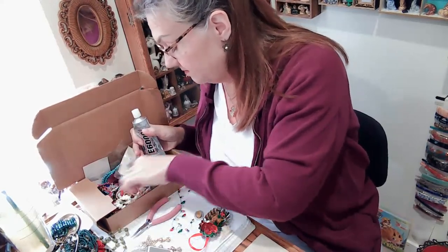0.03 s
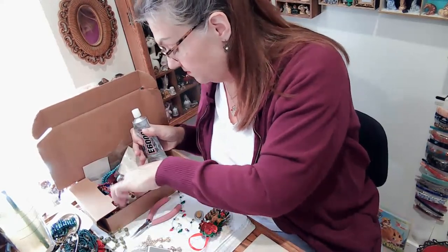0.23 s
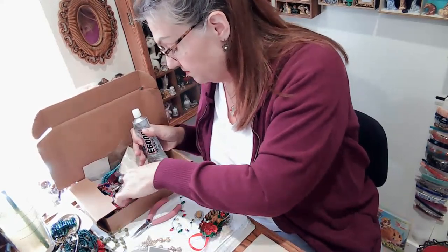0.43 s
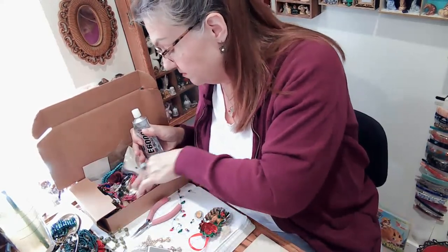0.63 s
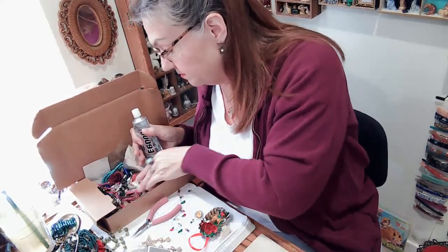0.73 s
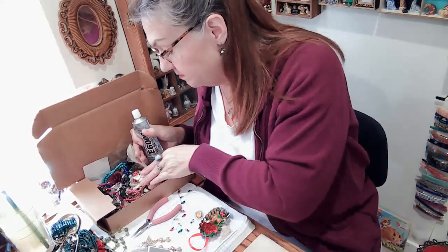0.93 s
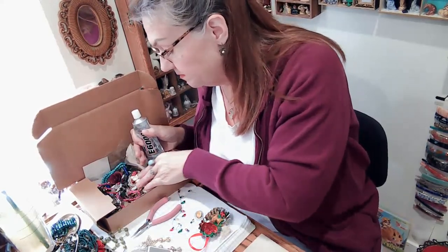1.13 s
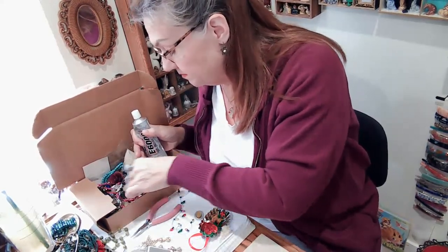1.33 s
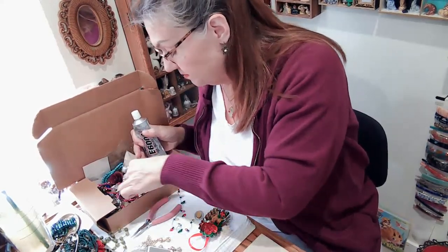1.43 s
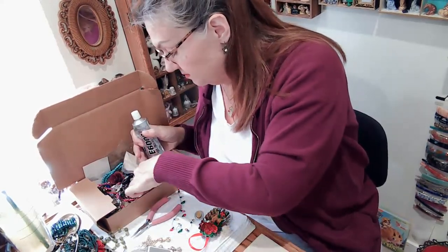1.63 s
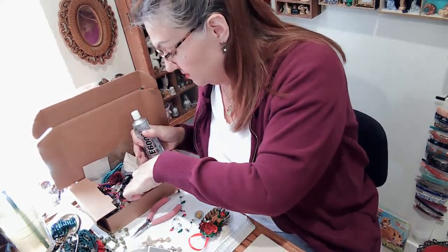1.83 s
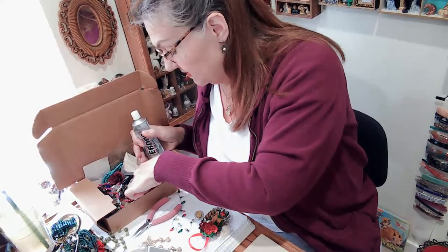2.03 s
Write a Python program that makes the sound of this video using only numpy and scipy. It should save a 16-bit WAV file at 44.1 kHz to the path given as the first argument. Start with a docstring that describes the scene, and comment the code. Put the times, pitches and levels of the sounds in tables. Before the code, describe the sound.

Beads and small jewelry rattle in a cardboard box as a hand stirs them, starting with a bright jingle, then knocks and clinks, one hard knock, then softer clicks; close microphone, small quiet room.

```python
"""A small room, a cardboard box of beads and loose jewelry close to one microphone, a hand rummaging in it.
Each stroke sets random bead contacts rattling and ringing, and scrapes them over the cardboard.
Heavy pieces knock on damped panel modes; beads click as short coloured bursts; small pieces clink or slide.
Metal modes jingle at the start, fine parts fizz in the top treble, and the hand bumps the hollow box.
Behind it lies a quiet room tone of coloured noise."""
import sys
import numpy as np
from scipy import signal
from scipy.fft import rfft, irfft, next_fast_len
from scipy.io import wavfile
from scipy.ndimage import map_coordinates

SR = 44100
rng = np.random.default_rng(int(sys.argv[2]) if len(sys.argv) > 2 else 0)


def pcm_store(signal):
    """Save signal as 16-bit PCM."""
    levels = np.round(np.clip(np.atleast_2d(signal), -1, 1) * 32767)
    wavfile.write(sys.argv[1], SR, levels.astype(np.int16).T)


N = 91595

BEAD_RATE, SCRAPE_RATE = 800, 900  # contacts per s
SCATTER_DB = 2.6  # spread of contact sizes


def amp(db):
    """Decibels to gain."""
    return 10 ** (np.asarray(db) / 20)


def unit(x):
    """Scale to rms 1."""
    return x / np.sqrt(np.mean(x ** 2) + 1e-20)


def along(points, hz):
    """Interpolate (Hz, value) points on a log frequency axis."""
    f, v = np.transpose(points)
    return np.interp(np.log(hz + 1), np.log(f + 1), v)


def filtered(x, response):
    """Weight the spectrum of x by a response of frequency."""
    m = next_fast_len(len(x) + 4096)
    spectrum = rfft(x, m) * response(np.fft.rfftfreq(m, 1 / SR))
    return irfft(spectrum, m)[:len(x)]


def highpass(x, hz):
    """Remove what lies below hz."""
    return signal.sosfilt(signal.butter(4, hz, 'high', fs=SR, output='sos'), x)


def resonance(f, hz, width):
    """Response of one damped resonance, peaking at 1."""
    return 1j * f * width / (hz * hz - f * f + 1j * f * width)


def add(out, s, x):
    """Mix x into out at time s."""
    i = max(0, round(s * SR))
    out[i:i + len(x)] += x[:max(0, N - i)]


def decay(t, t60):
    """Exponential fade, 60 dB down after t60 seconds."""
    return np.exp(-np.log(1000) * t / t60)


def swell(s, rise, hold, fall):
    """Linear rise, hold, then a fall in dB per second."""
    t = np.arange(N) / SR - s
    return np.clip(t / rise, 0, 1) * amp(-fall * np.maximum(t - rise - hold, 0))


def ring(modes, attack_s):
    """Damped modes struck once, their levels a little different at each strike."""
    t = np.arange(SR // 2) / SR
    tones = np.zeros(len(t))
    for hz, db, t60 in modes:
        tones += amp(db + rng.normal()) * decay(t, t60) * np.sin(2 * np.pi * hz * t)
    return tones * (1 - np.exp(-t / attack_s)) ** 2


def contacts(rate):
    """Tiny impacts of random size and sign at random moments."""
    chance, size, sign = rng.random(N), rng.standard_normal(N), rng.choice([-1, 1], N)
    return (chance < rate / SR) * sign * amp(SCATTER_DB * np.clip(size, -2, 2))


# Colour of the quiet room: f/Hz, level/dB
ROOM_TONE_COLOUR = [(25, -35), (50, -8), (85, 1.5), (300, -1), (500, -9), (3000, -25.5), (15500, -22.5)]
ROOM_TONE_DB = -59.5


def room_tone():
    """Steady noise with the colour of the quiet room."""
    noise = rng.standard_normal(N)
    return amp(ROOM_TONE_DB) * unit(filtered(noise, lambda f: amp(along(ROOM_TONE_COLOUR, f))))


# Reverberation of the small room: f/Hz, t60/s
ROOM_T60 = [(200, 0.2), (1600, 0.31), (6000, 0.26)]
ROOM_DB, EARLY_DB = -8.5, -8.5  # energy against the direct sound
EARLY_T60_S = 0.028


def room(x):
    """Direct sound, quick echoes off lid and table, and the short tail of the room."""
    hz, t, bands = signal.stft(rng.standard_normal(SR // 2), SR, nperseg=256)
    fading = bands * decay(t, along(ROOM_T60, hz)[:, None])  # each band fades at its own pace
    tail = signal.istft(fading, SR, nperseg=256)[1]
    t = np.arange(len(tail)) / SR
    early = rng.standard_normal(len(t)) * decay(t, EARLY_T60_S) * (t > .003)
    tail = tail * (t > .006)
    echo = amp(EARLY_DB) * early / np.linalg.norm(early) + amp(ROOM_DB) * tail / np.linalg.norm(tail)
    return x + signal.fftconvolve(x, echo)[:N]


# Resonances inside the box: f/Hz, width/Hz, level/dB against the direct sound
BOX_AIR = [(1280, 19, -20.5), (1600, 11, -16), (1640, 18, -10.5)]


def box_air(x):
    """The open box adds narrow resonances."""
    return filtered(x, lambda f: 1 + sum(amp(db) * resonance(f, hz, width) for hz, width, db in BOX_AIR))


# The hand bumps the box: t/s, hollow boom level/dB, wall level/dB
BUMPS = [(0.026, -39, -39), (.185, -37.5, -27), (0.217, -41.5, -25), (.302, -45, -19), (.315, -27, -15.5),
         (0.461, -45.5, -30), (0.713, -36, -44.5), (0.806, -41.5, -58.5), (1.772, -68, -33.5)]
# Hollow modes of the box: f/Hz, level/dB, t60/s
BOOM_MODES = [(142.2, -7.5, 0.11), (200, 3.5, 0.095)]
# Modes of the box walls: f/Hz, level/dB, t60/s
WALL_MODES = [(476, -3, 0.063), (583.6, 9, 0.035), (739, -4.5, 0.064)]
BUMP_ATTACK_S = 0.0029
BUMP_DETUNE = .025  # relative spread: the pressing hand shifts the modes from bump to bump


def bumps():
    """Soft blows sound the low modes of the box."""
    out = np.zeros(N)
    for s, boom_db, wall_db in BUMPS:
        for modes, db in (BOOM_MODES, boom_db), (WALL_MODES, wall_db):
            pressed = [(hz * np.exp(BUMP_DETUNE * rng.normal()), level, t60) for hz, level, t60 in modes]
            add(out, s, amp(db) * ring(pressed, BUMP_ATTACK_S))
    return out


FINE_RISE_S, FINE_FALL_DB_PER_S = .01, 410  # shared by slithers and slides

# The finest parts slither: start t/s, hold/s, level/dB
SLITHERS = [(0, 0.051, -36.5), (1.325, .045, -45.5)]
SLITHER_LOW_HZ = 11800


def slither():
    """Fine chain slides: tiny contacts, heard only in the top treble as a thin fizz."""
    fizz = unit(highpass(contacts(BEAD_RATE), SLITHER_LOW_HZ))
    return fizz * sum(amp(db) * swell(s, FINE_RISE_S, hold, FINE_FALL_DB_PER_S) for s, hold, db in SLITHERS)


# A piece slides and sings at its own resonance: start t/s, hold/s, level/dB, f/Hz
SLIDES = [(.34, 0.073, -41, 1620), (1.661, 0.054, -48.5, 1760)]
SLIDE_WIDTH_HZ = 150


def slides():
    """Tiny slips keep one narrow resonance of a sliding piece ringing."""
    out = np.zeros(N)
    for s, hold, db, hz in SLIDES:
        tone = unit(filtered(contacts(SCRAPE_RATE), lambda f: resonance(f, hz, SLIDE_WIDTH_HZ)))
        out += amp(db) * tone * swell(s, FINE_RISE_S, hold, FINE_FALL_DB_PER_S)
    return out


# Modes of the small metal parts: f/Hz, level/dB, t60/s
METAL_MODES = [(4394, -17, 0.38), (5700, -2, .04), (7910, -4, 0.076), (8090, -4, 0.075), (9190, -3, 0.37),
               (9383, -7.5, 0.059), (9680, 0.5, 0.029)]
JINGLE_DB, JINGLE_RATE = -15.5, 1300  # level; contacts per s
JINGLE_HOLD_S, JINGLE_FALL_DB_PER_S = 0.022, 247


def jingle():
    """Small metal parts strike each other many times at the start and settle."""
    strikes = contacts(JINGLE_RATE)
    glints = unit(signal.fftconvolve(strikes, ring(METAL_MODES, attack_s=0.00011))[:N])
    return amp(JINGLE_DB) * glints * swell(0, 0.0009, JINGLE_HOLD_S, JINGLE_FALL_DB_PER_S)


# Colour of bead contacts, in clicks, clinks and rattle alike: f/Hz, level/dB
BEAD_COLOUR = [(800, -33.5), (2000, -5), (3200, 0.5), (4000, -4), (6500, -1), (8000, -5), (9700, -3.5),
               (10800, -11.5), (15500, -19.5)]
CLICK_T60_S, CLICK_ATTACK_S = .008, .0005
CLICK_OCTAVES = 0.37  # offset from the pitch at which the weight has halved


def click(hz):
    """One short hard contact: a noise burst weighted around a pitch."""
    t = np.arange(SR // 32) / SR
    burst = rng.standard_normal(len(t)) * decay(t, CLICK_T60_S) * (1 - np.exp(-t / CLICK_ATTACK_S)) ** 2

    def colour(f):
        octaves = np.log2((f + 1) / hz)
        return amp(along(BEAD_COLOUR, f)) / (1 + (octaves / CLICK_OCTAVES) ** 2)

    return 0.052 * unit(filtered(burst, colour))


# Small hard pieces clink with a clear pitch: t/s, level/dB, f/Hz
CLINKS = [(0.188, -23, 3000), (.463, -21.5, 3146), (0.497, -24, 3960), (.52, -21.5, 6760),
          (.529, -28, 6360), (.64, -20.5, 5280), (1.3335, -33, 3560)]
CLINK_T60_S, CLINK_ATTACK_S = .03, .0004


def clinks():
    """A small hard piece ticks and rings on briefly."""
    out = np.zeros(N)
    for s, db, hz in CLINKS:
        add(out, s, ring([(hz, db, CLINK_T60_S)], CLINK_ATTACK_S))
        add(out, s, amp(db) * click(hz))
    return out


# Beads click together: t/s, gain on a click/dB, f/Hz
CLICKS = [(0.1233, -12, 3600), (0.4335, -10.5, 6300), (0.6, -14.5, 3580), (0.7725, -8.5, 6800),
          (0.9268, -17, 5500), (0.9376, -8, 5100), (1.005, -12, 7060), (1.0125, -14, 7980),
          (1.0305, -10.5, 7100), (1.123, -15.5, 7050), (1.1613, -26, 4940), (1.3344, -19, 3970),
          (1.364, -14.5, 2700)]


def clicks():
    """Single beads hit one another."""
    out = np.zeros(N)
    for s, db, hz in CLICKS:
        add(out, s, amp(db) * click(hz))
    return out


# Heavy pieces knock on the cardboard: t/s, peak level/dB, pitch of the struck spot/ratio to the modes
KNOCKS = [(0.2917, -7, 0.94), (0.3151, -10.5, 0.76), (0.3222, -10.5, .88), (0.3356, -12.5, 0.775),
          (0.4334, -11, 0.95), (0.463, -13, 0.98), (0.5627, -17, 1.2), (0.6316, -7.5, 1.07),
          (0.7727, 1.5, 1), (1.373, -27.5, 0.95)]
# Cardboard panel modes: f/Hz, level/dB, t60/s
PANEL_MODES = [(1185, -12, 0.0059), (1654, -2.5, 0.005), (1867, -3, 0.0057)]
PANEL_ATTACK_S = .0009
PANEL_LOW_HZ = 850  # the cardboard radiates little below this


def knocks():
    """A heavy piece rings the cardboard for a few cycles; slacker spots sound lower."""
    out = np.zeros(N)
    for s, db, pitch in KNOCKS:
        spot = [(hz * pitch, level, t60) for hz, level, t60 in PANEL_MODES]
        blow = highpass(ring(spot, PANEL_ATTACK_S), PANEL_LOW_HZ)
        add(out, s, amp(db) * blow / np.abs(blow).max())
    return out


TINK_T60_S = 0.045
TINK_LOW_HZ, TINK_HIGH_HZ = 2249, 12013


def tinks(hits, count):
    """Each contact rings one of many beads, each bead with its own pitch."""
    t = np.arange(SR // 16) / SR
    owner = rng.integers(count, size=N)
    spread = (np.arange(count) + rng.random(count)) / count
    pitches = TINK_LOW_HZ + (TINK_HIGH_HZ - TINK_LOW_HZ) * spread
    tones = decay(t, TINK_T60_S) * np.sin(2 * np.pi * pitches[:, None] * t)
    out = np.zeros(N + len(t))
    for i in np.flatnonzero(hits):
        out[i:i + len(t)] += hits[i] * tones[owner[i]]
    return out[:N]


# Strokes of the hand: start t/s, rise/s, hold/s, fall of the effort/(dB per s),
# beads level/dB, cardboard level/dB, centre of the moved beads f/Hz
STROKES = [(0, 0.00031, 0.041, 388, -23.5, -27.5, 7400), (0.114, 0.0044, 0.038, 271, -38, -37, 3880),
           (0.163, 0.039, 0.016, 338, -33.5, -31.5, 4370), (0.283, 0.015, 0.024, 199, -32, -25.5, 3640),
           (0.422, 0.03, 0.16, 141, -32, -27.5, 4740), (0.57, 0.043, 0.056, 94, -25, -22.5, 5150),
           (0.761, 0.0059, 0.011, 176, -23.5, -22.5, 6600),
           (0.881, 0.057, 0.0082, 225.5, -34.5, -43.5, 5200), (1.109, 0.018, 0.024, 211, -39.5, -54, 4570),
           (1.232, 0.052, 0.09, 192.5, -54, -64, 4970), (1.323, 0.0079, 0.049, 298, -39.5, -44.5, 4930),
           (1.393, 0.024, 0.0099, 388, -42, -55.5, 5430), (1.618, 0.11, 0.14, 200, -48.5, -50, 4040),
           (1.749, 0.0075, 0.0067, 266.5, -28, -28.5, 5830), (1.811, 0.01, 0.036, 278, -30, -34, 5400),
           (1.997, 0.083, 0.034, 207, -43, -41.5, 3580)]
# Colour of scraped cardboard: f/Hz, level/dB
SCRAPE_COLOUR = [(40, -57.5), (200, -17.5), (320, -26), (560, -10.5), (900, -13.5), (1300, -5), (1650, 1.5),
                 (2000, 3), (2550, -10.5), (3300, -21.5), (6000, -38)]
BEAD_OCTAVES = 0.69  # offset from the centre at which a stroke's beads are 3 dB down
TINK_DB = -4  # ring of the beads against their ticks
SCRAPE_GROWTH = 1.17  # exponent: the scrape follows the effort more steeply than the beads do
SCRAPE_SAG = .07  # share by which the scrape's pitch drops as the effort eases


def rummage():
    """Each stroke stirs its own handful of beads and scrapes them over the cardboard."""
    out = np.zeros(N)
    scrape = unit(filtered(contacts(SCRAPE_RATE), lambda f: amp(along(SCRAPE_COLOUR, f))))
    for s, rise, hold, fall, bead_db, box_db, hz in STROKES:
        effort = swell(s, rise, hold, fall)
        hits = contacts(BEAD_RATE)
        beads = unit(hits) + amp(TINK_DB) * unit(tinks(hits, count=40))

        def colour(f):
            octaves = np.log2((f + 1) / hz)
            return amp(along(BEAD_COLOUR, f)) / np.hypot(1, octaves / BEAD_OCTAVES)

        rattle = unit(filtered(beads, colour))
        # less effort reads the scraped surface more slowly, from a random starting place
        travel = rng.integers(N) + np.cumsum(1 - SCRAPE_SAG * (1 - effort))
        rub = map_coordinates(scrape, [travel], mode='wrap')
        out += amp(bead_db) * effort * rattle
        out += amp(box_db) * effort ** SCRAPE_GROWTH * rub
    return out


def scene():
    """Everything in the box, heard through the room over its quiet tone."""
    box = box_air(rummage() + knocks())
    box = box + clicks() + clinks() + slides() + bumps() + jingle() + slither()
    tone = room_tone()
    return (amp(-1.0) * room(box) + tone)[None]


CEILING = .95  # full scale is 1
TOP_HZ = 15750


def record(dry):
    """The highest peaks are gently rounded off below full scale; the recorder keeps nothing above its band
    limit."""
    held = dry[0] / (1 + np.abs(dry[0] / CEILING) ** 6) ** (1 / 6)
    return filtered(held, lambda f: f < TOP_HZ)[None]


dry = scene()
out = record(dry)
pcm_store(out)
```